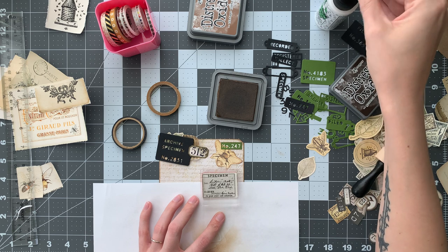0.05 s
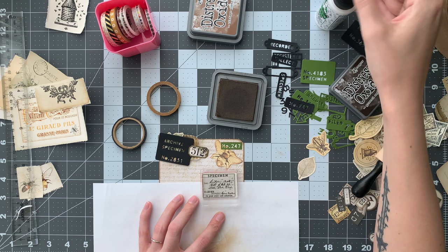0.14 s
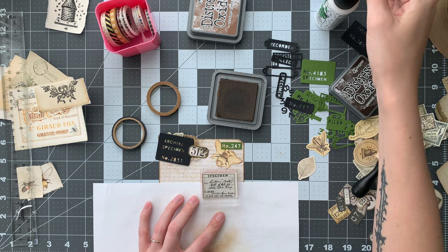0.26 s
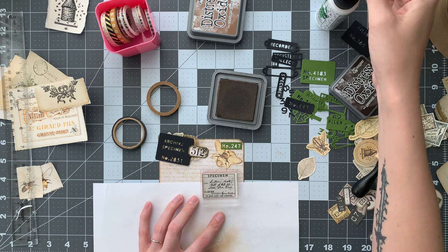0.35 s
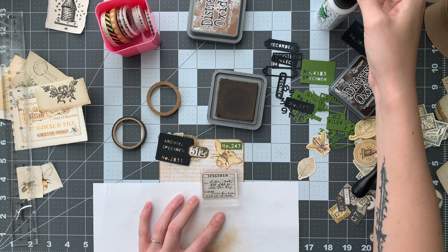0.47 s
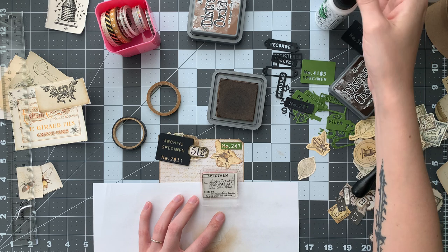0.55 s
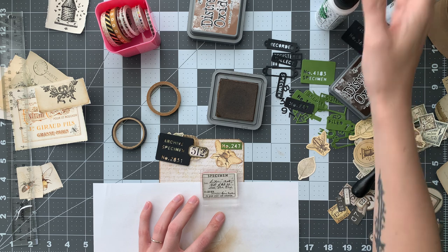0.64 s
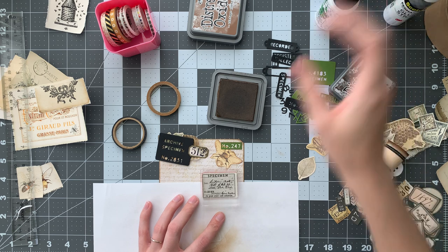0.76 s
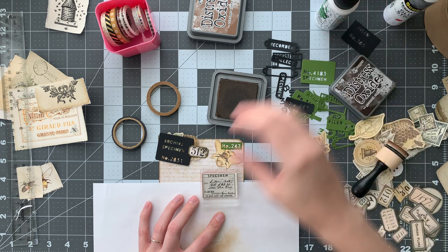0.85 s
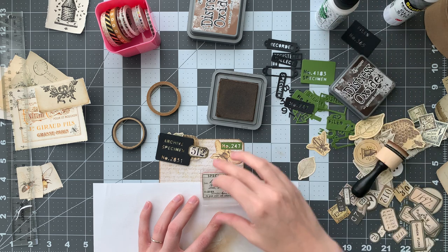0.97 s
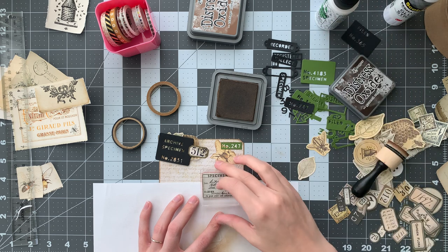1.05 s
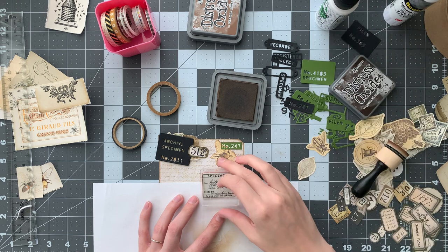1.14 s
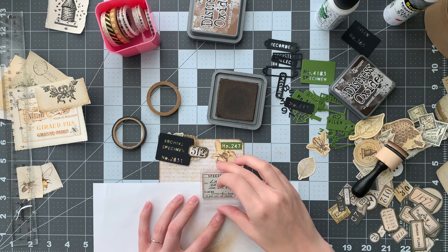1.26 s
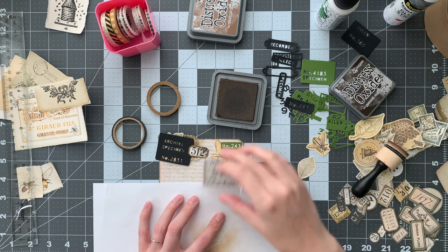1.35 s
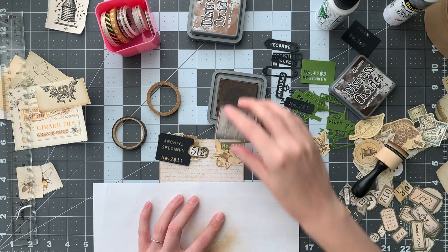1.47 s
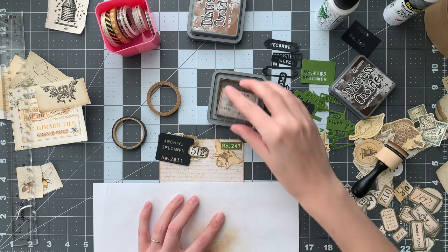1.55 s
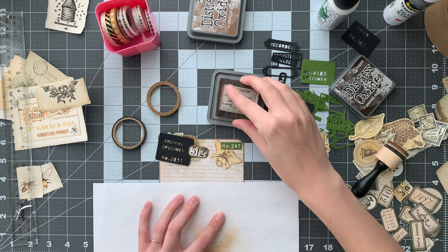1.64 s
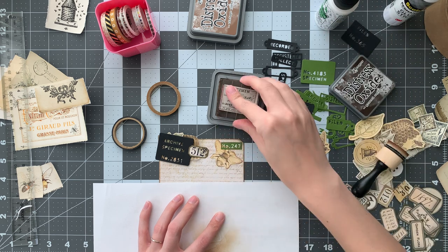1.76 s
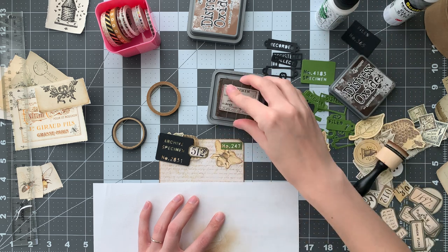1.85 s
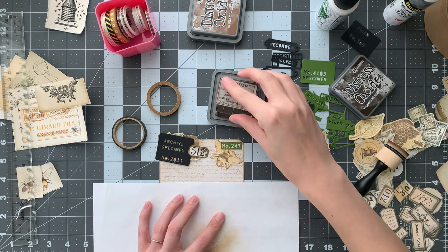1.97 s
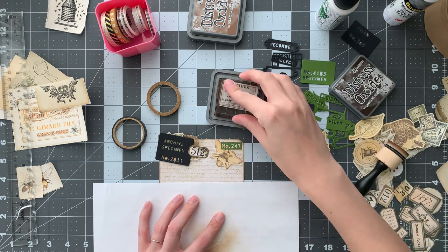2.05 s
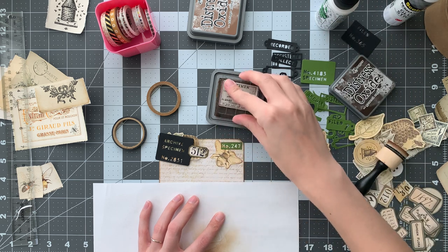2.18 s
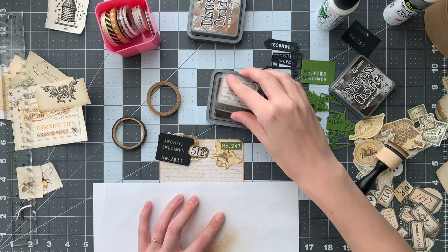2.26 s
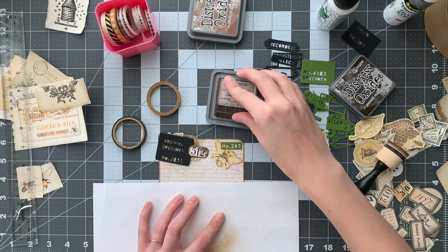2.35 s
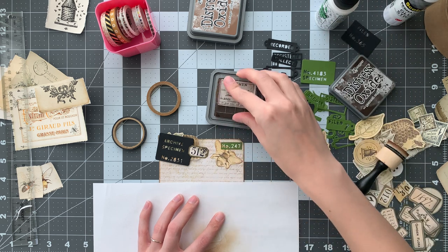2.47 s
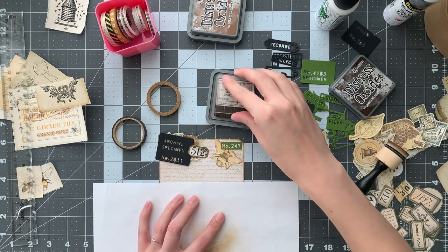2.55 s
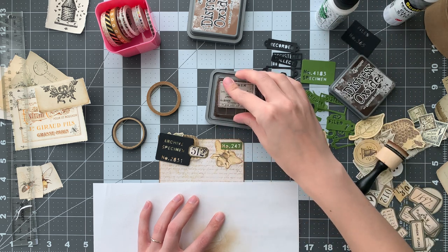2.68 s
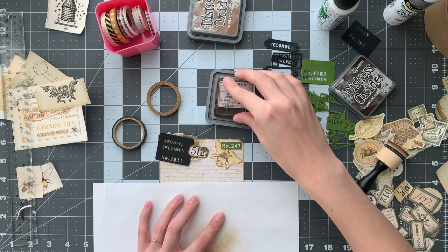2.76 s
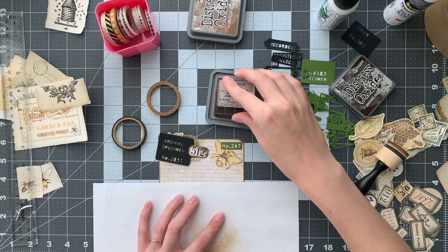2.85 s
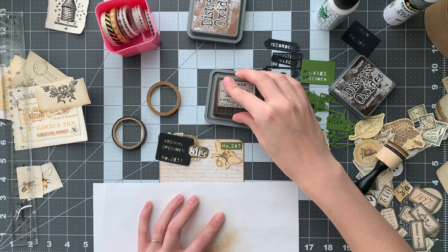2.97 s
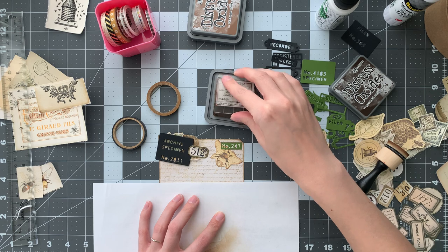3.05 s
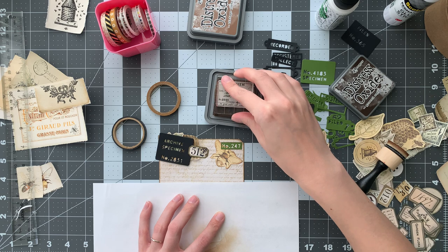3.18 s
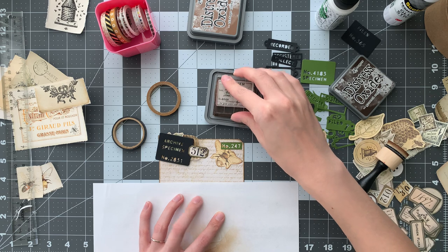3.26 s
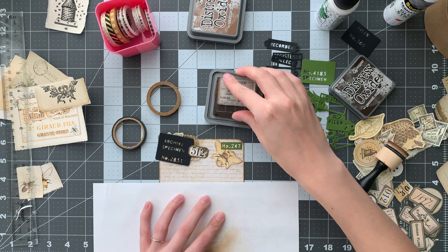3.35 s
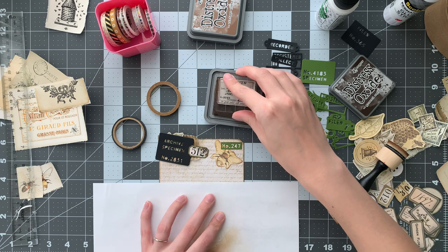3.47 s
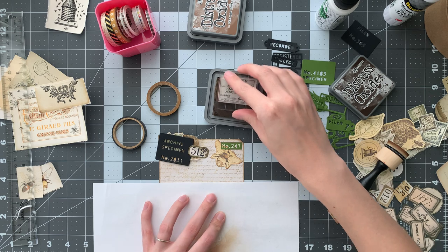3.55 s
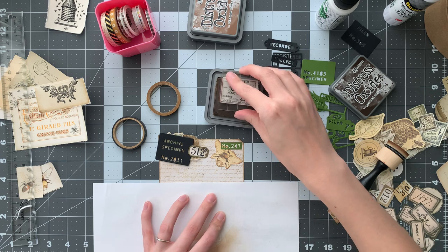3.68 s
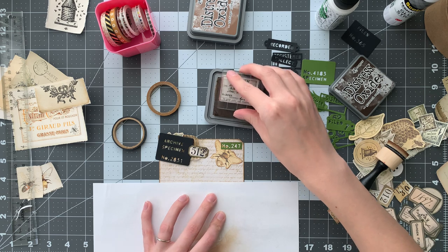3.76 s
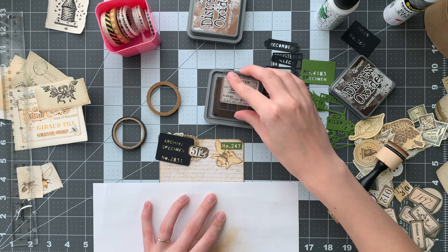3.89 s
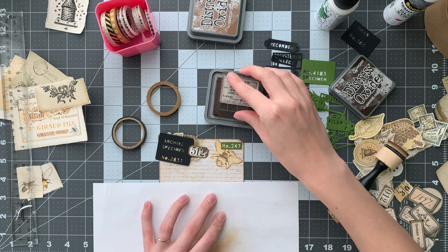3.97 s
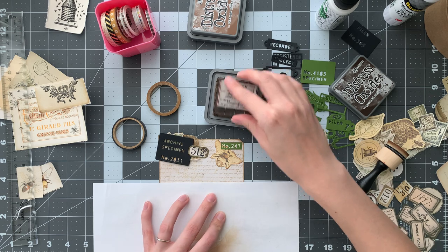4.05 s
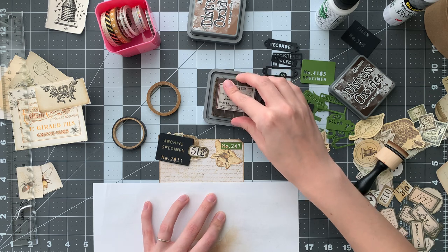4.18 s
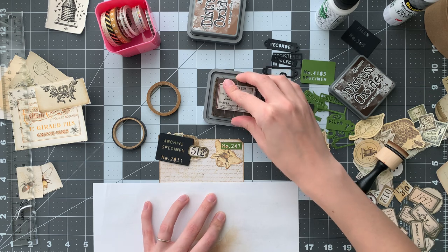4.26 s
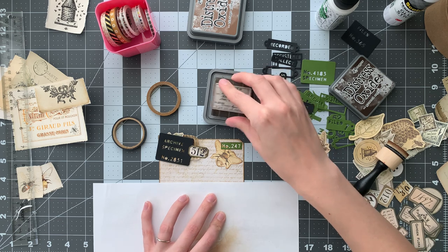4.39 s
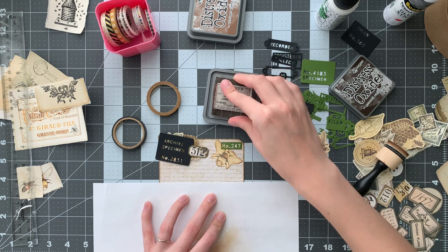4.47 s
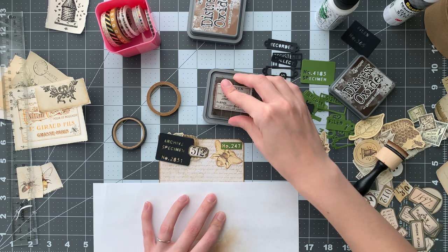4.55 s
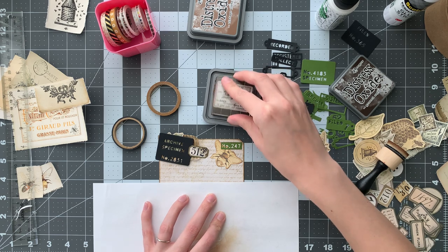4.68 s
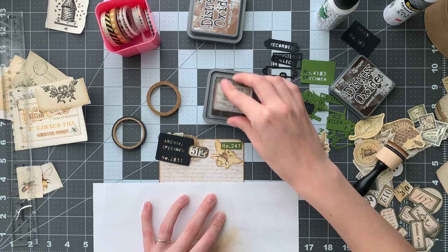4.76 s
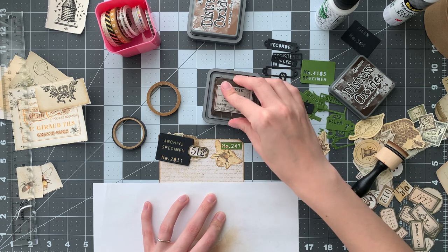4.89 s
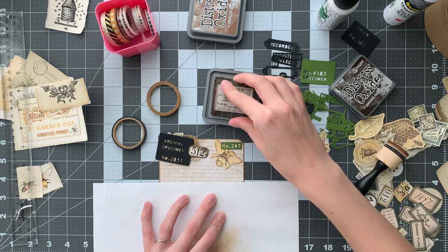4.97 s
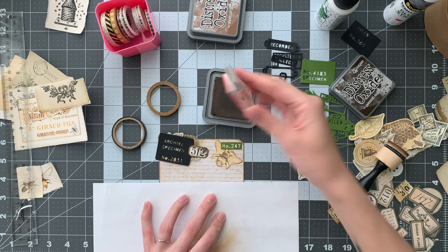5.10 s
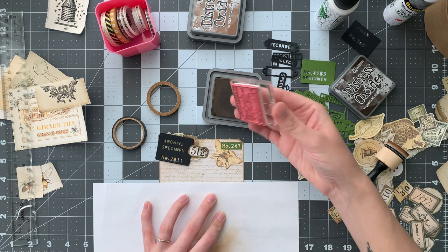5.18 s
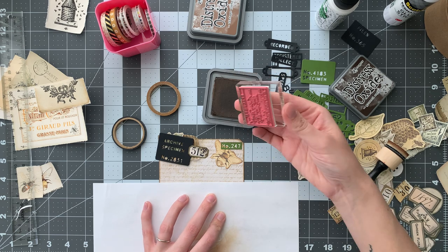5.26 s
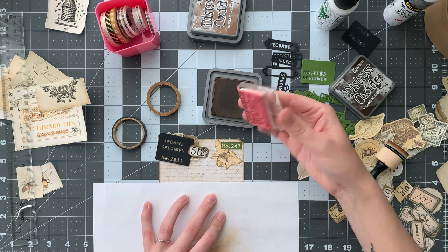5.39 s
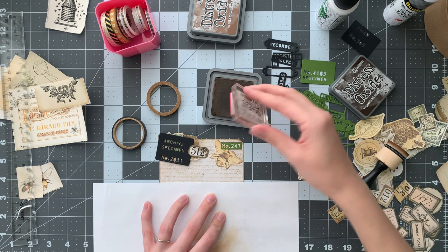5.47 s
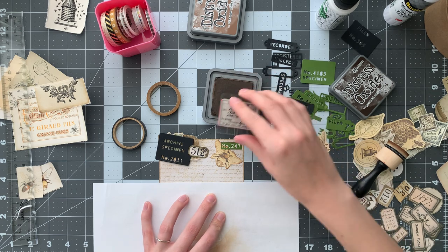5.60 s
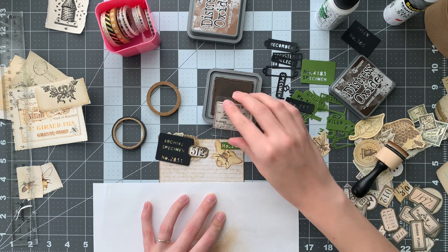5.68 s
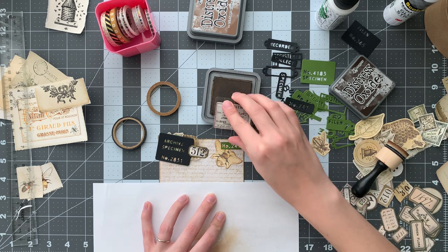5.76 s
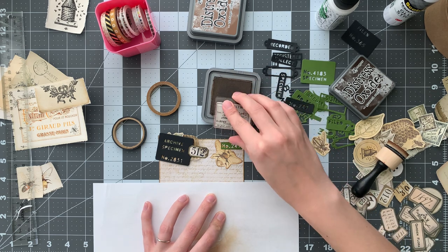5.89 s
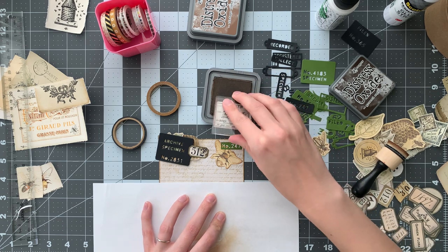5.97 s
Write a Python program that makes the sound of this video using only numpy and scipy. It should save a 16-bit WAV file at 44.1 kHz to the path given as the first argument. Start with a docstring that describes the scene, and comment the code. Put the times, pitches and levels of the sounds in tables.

```python
"""At a craft desk in a small, dry room, a rubber stamp on an acrylic block is dabbed twelve times on an ink pad.
Clicks and soft bumps come first. Each dab is a double impact, one edge and then the whole face: desk, plastic
pad case and block ring as sums of decaying modes, and the contacts are short filtered noise with reflections.
Tacky ink lets go in small noisy smacks and fingers rustle. Room air (shaped noise), a wavering low hum and
thin whines (sines) lie underneath; a faint treble hiss comes up and fades."""
import sys
import numpy as np
from scipy import signal
from scipy.fft import rfft, irfft
from scipy.io import wavfile
from scipy.ndimage import uniform_filter1d

SR = 44100
rng = np.random.default_rng(int(sys.argv[2]) if len(sys.argv) > 2 else 0)


def unload_audio(sound):
    """Save the sound as a 16-bit wav file, at the path given as the first command line argument."""
    columns = np.transpose(np.atleast_2d(sound))
    # keep every value between -1 and 1, then stretch to whole-number steps
    steps = np.round(np.clip(columns, -1, 1) * 32767)
    wavfile.write(sys.argv[1], SR, steps.astype(np.int16))


N = 265923

# Room air, spectrum before scaling: frequency_hz, level_db
AIR_SPECTRUM = [(15, -46.5), (25, -25.5), (37, -12.5), (91, -8.5), (122, -4), (136, -11), (148, -18),
                (173, -14), (684, -44), (1340, -44), (1800, -47), (7910, -54), (8580, -56.5),
                (10600, -51.5), (15500, -62.5)]
# Hum, level over time: time_s, level_db
HUM_LEVEL = [(0, -63), (.16, -45), (.38, -65), (.8, -57), (1.15, -75), (2.1, -59.5), (4.95, -58.5),
             (5.2, -69.5), (5.65, -54), (6.03, -59.5)]
# Thin steady whines: frequency_hz, level_db
WHINES = [(721.4, -101), (1157, -104), (1308, -100)]
# Small hard things click together: start_s, level_db
CLICKS = [(0.094, -82), (0.418, -66.5), (0.429, -62.5), (0.4444, -42.5), (1.284, -71)]
# Soft bumps of hand and block: start_s, level_db, hardness (0-1), tock_pitch_hz
BUMPS = [(0.106, -60.5, 0.38, 530), (.149, -57.5, 0, 640), (.421, -55.5, .5, 610),
         (0.595, -63.5, 0.35, 637), (0.776, -76, 0.03, 640), (2.416, -62, 0.85, 672),
         (3.132, -52.5, 0.55, 553), (5.166, -73.5, 0.63, 820), (5.251, -63.5, 0.45, 1190),
         (5.308, -64, 0.52, 535)]
# Dabs on the pad: start_s (seating), force_db, flatness (0-1), edge_lead_s,
# boom_db and knock_db (desk, relative to the force), tock_pitch_hz
DABS = [(1.658, -53, 0.088, 0.0034, 5.5, -3.5, 1146), (2.0522, -47.5, 0.29, 0.0077, 3, -3.5, 1000),
        (2.365, -55, 0.13, .004, 3, 2.5, 463), (2.635, -51.5, 0.086, 0.0034, 4, 4.5, 1010),
        (2.89, -46.5, 0.059, .0045, 9, 0.5, 797), (3.377, -44.5, 0.23, .002, -3.5, 1, 995),
        (3.627, -39, 0.51, 0.0022, -1, -12, 575), (3.8546, -44, 0.177, .002, 8, 2.5, 1026),
        (4.099, -37.5, 0.95, .0023, -2.5, -11, 935), (4.4343, -45, 0.26, .0055, 7.5, -2, 1190),
        (4.802, -44, 0.067, 0.0033, 5, 3, 1201), (5.765, -46.5, .16, 0.0047, 2, 2, 1005)]
# The rubber pulls free of the ink: start_s, level_db, tilt_db_per_octave
SMACKS = [(3.046, -67.5, -10), (4.318, -60, 0), (4.677, -68.5, 0)]

# Modes of the desk top, in three groups: frequency_hz, relative_level_db, t60_s
DESK_THUMP_MODES = [(45.25, -16, 0.034), (61, 0, 0.24), (83.6, -0.5, 0.15)]
DESK_BOOM_MODES = [(121.2, -6, 0.22), (158.3, -9.5, 0.29), (202.3, -4, 0.21), (228.1, -3, 0.17)]
DESK_KNOCK_MODES = [(286.5, -3.5, 0.093), (332.4, 4, 0.14), (406.5, -10, 0.16)]
# Modes of the plastic pad case: frequency_hz, relative_level_db, t60_s
CASE_MODES = [(480.5, -3, 0.12), (596, -0.5, 0.1), (780, -6, 0.12), (872, -1.5, 0.048), (952, 0.5, 0.08),
              (1003, -7.5, 0.021), (1153, -4, 0.11), (1436, 1, 0.066), (1740, -3, .06), (2016, -5.5, 0.029)]
# Modes of the acrylic block: frequency_hz, relative_level_db, t60_s
BLOCK_MODES = [(2380, -3, .07), (2527, -7, 0.07), (2690, -1, 0.08), (3024, -1.5, 0.08), (3240, -2.5, 0.036),
               (3494, -3.5, 0.034), (4080, -7.5, 0.08), (4730, -14.5, .04)]

# Spectra of the short contacts, the hiss and the rustle: frequency_hz, relative_level_db
CLICK_SPECTRUM = [(500, -24.5), (1100, -32), (1600, -13.5), (2700, -28), (4000, -19.5), (4800, -11),
                  (7000, -10), (9500, -6.5), (11000, 0.5), (12400, -9.5), (13200, -9.5), (14200, -10.5),
                  (16500, -28)]
CLACK_SPECTRUM = [(200, -29), (340, -11.5), (440, 2.5), (700, -1), (1050, 2.5), (1400, 0.5), (1750, -10.5),
                  (2100, -14.5), (2600, -23.5), (5000, -69.5)]
CRACK_SPECTRUM = [(900, -33.5), (1900, 2.5), (2800, -2.5), (4000, -7), (5200, -8.5), (6800, -16.5),
                  (9000, -41.5), (16000, -50)]
SNAP_SPECTRUM = [(4000, -38.5), (6500, -4.5), (8500, 3), (11000, 1.5), (13000, 1.5), (15000, -6.5),
                 (16500, -21.5)]
SMACK_SPECTRUM = [(300, -9.5), (650, -21), (1100, 0), (2200, -5.5), (2700, -4), (4200, -16.5), (5800, -26),
                  (8000, -44), (16000, -35)]
HISS_SPECTRUM = [(2000, -19.5), (5000, -8), (8500, -8), (12000, -3), (14000, -2.5), (15600, -11),
                 (16200, -44)]
RUSTLE_SPECTRUM = [(120, -15), (250, -4.5), (500, -3.5), (800, -7), (1250, -20), (1800, -36), (5000, -40)]

# Decay of the reflections: frequency_hz, t60_s
ROOM_T60 = [(300, 0.22), (1000, .15), (3000, 0.19), (7000, 0.15), (14000, 0.092)]
# Likeness of left and right, near sounds and room air: frequency_hz, coherence (0-1)
NEAR_COHERENCE = [(100, 0.89), (400, 1), (1000, 0.54), (2000, 0.26), (5500, 0.29), (8000, 0.92), (16000, 1)]
AIR_COHERENCE = [(60, 0.85), (130, .93), (300, 0.8), (700, 0.54), (1500, .15), (5500, 0.069), (8000, 1),
                 (16000, 0.57)]
# Phase lead of the left microphone over the right: frequency_hz, phase_rad
LEFT_PHASE = [(20, 0), (150, 0.36), (450, 1.09), (1100, 0.62), (1600, 4.5), (2200, 1.5), (3000, 1.5),
              (5500, 3), (6700, 0), (8500, -np.pi), (11000, -2 * np.pi), (13500, -3 * np.pi),
              (15500, -4 * np.pi)]
# Level of the left microphone over the right: frequency_hz, level_db
LEFT_BALANCE = [(100, 0.2), (300, -0.3), (550, 1.5), (1100, 1), (2000, 0.1), (5000, -0.5), (8000, -0.5)]

# Growth of a dab's parts: level_db at the usual force, slope (dB per dB of force), flat_db (added when flat)
USUAL_FORCE_DB = -46
THUMP_LAW, TOCK_LAW = (-45, 0.3, 0), (-51, 0.77, 0)
CLACK_LAW, CRACK_LAW, SNAP_LAW = (-47.5, 1, 0), (-56, 0.84, 10.9), (-80, 0.34, 32.5)
# Growth of a bump's parts: soft_db relative to the bump, hard_db (added at hardness 1)
BUMP_KNOCK, BUMP_TOCK, BUMP_CLACK, BUMP_CRACK = (-16, 9.9), (-40.5, 46), (-36, 37), (-50.5, 39)

EDGE_DB, EDGE_FLAT_DB = -2, -11  # first edge against the seating; added to it when the landing is flat
SEATING_DECAY_S, FLAT_SHORTENS = 0.0027, 0.93  # decay constant, and the share a flat landing takes off
FELT_RISE_S = 0.003  # the felt softens the onset of the first touch
CASE_DB, BLOCK_DB = -1, -0.5  # ringing against the direct chatter of the contact
TOCK_T60_S = 0.038
AIR_DB = -59.5
HUM_HZ, HUM_WAVER_DB = 123, 4.5
HISS_START_S, HISS_RISE_S, HISS_DB, HISS_FADE_DB_PER_S = 3.24, 0.06, -70.5, 32
RUSTLE_S, RUSTLE_WIDTH_S, RUSTLE_DB = 4, 0.14, -81.5
LOWPASS_HZ = 16300
BLOW_S = 0.06  # reference duration for the level of a short sound

TIME = np.arange(N) / SR
RING = np.arange(12288) / SR  # time axis of one impact, s


def amp(db):
    """Level to amplitude: 20 dB is a factor of ten."""
    return 10 ** (np.asarray(db) / 20)


def evened(x):
    """Normalization by the root mean square, to rms 1."""
    return x / np.sqrt(np.mean(x ** 2) + 1e-30)


def blow(x, db):
    """Equal energy: a short sound is given the energy of BLOW_S seconds at rms level db."""
    return amp(db) * evened(x) * np.sqrt(BLOW_S * SR / x.shape[-1])


def read(points, hz):
    """Interpolation of a table on a logarithmic frequency axis."""
    f, value = np.transpose(points)
    return np.interp(np.log(hz + 1), np.log(f + 1), value)


def add(mix, s, sound):
    """Superposition: a sound is summed into the mix from time s."""
    part = mix[:, max(round(s * SR), 0):][:, :sound.shape[-1]]
    part += sound[..., :part.shape[1]]


def coloured(x, spectrum, size=2048):
    """Minimum-phase filtering: the phase follows causally from the log magnitude by the Hilbert transform."""
    hz = abs(np.fft.fftfreq(size, 1 / SR))
    log_gain = np.log(amp(read(spectrum, hz)))
    response = np.exp(signal.hilbert(log_gain).conj())
    taps = np.fft.ifft(response).real[None, :size // 2]
    return signal.fftconvolve(x, taps, axes=1)[:, :x.shape[1]]


def noise_pair(coherence, size):
    """Partial coherence: the right channel blends the left's white noise with independent noise."""
    left, other = rfft(rng.standard_normal((2, size)))
    c = np.clip(read(coherence, np.fft.rfftfreq(size, 1 / SR)), -1, 1)
    right = c * left + np.sqrt(1 - c ** 2) * other
    return irfft(np.array([left, right]), size)


def wander(rate_hz):
    """Slow random fluctuation of rms 1: its amplitude spectrum falls exponentially with frequency."""
    falloff = np.exp(-np.fft.rfftfreq(N, 1 / SR) / rate_hz)
    return evened(irfft(rfft(rng.standard_normal(N)) * falloff, N))


def room_air():
    """Stationary random noise: a low rumble under fainter treble, partly coherent between the ears."""
    gain = amp(read(AIR_SPECTRUM, np.fft.rfftfreq(N, 1 / SR)))
    return amp(AIR_DB) * evened(irfft(rfft(noise_pair(AIR_COHERENCE, N)) * gain, N))


def hum():
    """Frequency and amplitude modulation: a low sine wavers in pitch and level."""
    pitch_hz = HUM_HZ + 4 * wander(rate_hz=7.7)
    waver = amp(HUM_WAVER_DB * wander(rate_hz=3.2))
    tone = np.sin(2 * np.pi * np.cumsum(pitch_hz) / SR) * waver
    return evened(tone) * amp(np.interp(TIME, *np.transpose(HUM_LEVEL)))


def whines():
    """Frequency modulation: faint sines, each with its own slight unsteadiness of pitch."""
    out = np.zeros(N)
    for hz, db in WHINES:
        cycles = hz * np.cumsum(1 + 0.0056 * wander(rate_hz=18)) / SR
        out += amp(db) * evened(np.sin(2 * np.pi * cycles))
    return out


def contact(spectrum, decay_s, room_db):
    """Contact noise: hard surfaces chatter briefly, then dense reflections from desk and walls decay."""
    envelope = np.exp(-RING / decay_s) * (1 - np.exp(-2.5 * RING / decay_s)) ** 2
    direct = noise_pair(NEAR_COHERENCE, len(RING)) * envelope
    hz, t, z = signal.stft(noise_pair(NEAR_COHERENCE, len(RING)), SR, nperseg=256)
    decay = amp(-60 * t / read(ROOM_T60, hz)[:, None])
    tail = signal.istft(z * decay, SR, nperseg=256)[1][:, :len(RING)]
    # early reflections are the strongest
    tail *= (1 - np.exp(-RING / 0.0046)) * (1 + 0.7 * np.exp(-RING / 0.012))
    return evened(coloured(direct, spectrum)) + amp(room_db) * evened(coloured(tail, spectrum))


def clicks():
    """Impact of small hard bodies: short, sharp contact noise with weak reflections."""
    out = np.zeros((2, N))
    for s, db in CLICKS:
        add(out, s, blow(contact(CLICK_SPECTRUM, decay_s=0.0018, room_db=-10.0), db))
    return out


def ring(modes, rise_cycles, scatter_db, spread, alternate=False):
    """Modal superposition: decaying modes build up over some cycles, their strength set by the spot struck."""
    hz, db, t60 = np.transpose(modes)[:, :, None]
    luck, turn = rng.standard_normal((len(modes), 2)).T[:, :, None]
    shape = amp(db + scatter_db * luck - 60 * RING / t60)
    shape *= 1 - np.exp(-RING * hz / rise_cycles)
    if alternate:  # away from the struck spot, neighbouring modes swing against each other
        shape[1::2] *= -1
    phase = 2 * np.pi * hz * RING
    sides = [(shape * np.sin(phase + side * spread * turn)).sum(0) for side in (-1, 1)]
    return np.array(sides)


def tock(hz, db):
    """Single-mode resonance: whatever is pressed gives a hollow tock, its pitch depending on the spot."""
    return blow(ring([(hz, 0, TOCK_T60_S)], rise_cycles=0.54, scatter_db=0, spread=0.069), db)


def desk(thump_db, boom_db, knock_db):
    """Plate modes: the desk top gives slowly as a whole, booms, and knocks in its higher modes."""
    thump = ring(DESK_THUMP_MODES, rise_cycles=0.96, scatter_db=3, spread=0.068)
    boom = ring(DESK_BOOM_MODES, rise_cycles=0.76, scatter_db=2.0, spread=0.04, alternate=True)
    knock = ring(DESK_KNOCK_MODES, rise_cycles=1.0, scatter_db=4.0, spread=0.24, alternate=True)
    return blow(thump, thump_db) + blow(boom, boom_db) + blow(knock, knock_db)


def plastic(clack_db, crack_db, decay_s, room_db):
    """Impact excitation of modes: the case rings under a clack, the block under a brighter crack."""
    case = evened(ring(CASE_MODES, rise_cycles=0.17, scatter_db=4.0, spread=0.71))
    block = evened(ring(BLOCK_MODES, rise_cycles=3.6, scatter_db=1.0, spread=0.66))
    clack = contact(CLACK_SPECTRUM, decay_s, room_db) + amp(CASE_DB) * case
    crack = contact(CRACK_SPECTRUM, decay_s, room_db + 3.5) + amp(BLOCK_DB) * block
    return blow(clack, clack_db) + blow(crack, crack_db)


def bumps():
    """Contact stiffness: the harder the bump, the more knock, tock, clack and crack join the desk's boom."""
    out = np.zeros((2, N))
    for s, db, hard, tock_hz in BUMPS:
        knock_db, tock_db, clack_db, crack_db = (
            db + soft_db + hard_db * hard
            for soft_db, hard_db in (BUMP_KNOCK, BUMP_TOCK, BUMP_CLACK, BUMP_CRACK))
        add(out, s, tock(tock_hz, tock_db))
        add(out, s, desk(db, db, knock_db))
        add(out, s, plastic(clack_db, crack_db, decay_s=0.0045, room_db=-1.5))
    return out


def dabs():
    """Double impact: one edge touches, then the block seats; a flatter landing gives a shorter, stronger snap."""
    out = np.zeros((2, N))
    for s, force_db, flat, lead_s, boom_db, knock_db, tock_hz in DABS:
        thump_db, tock_db, clack_db, crack_db, snap_db = (
            db + slope * (force_db - USUAL_FORCE_DB) + flat_db * flat
            for db, slope, flat_db in (THUMP_LAW, TOCK_LAW, CLACK_LAW, CRACK_LAW, SNAP_LAW))
        edge_db = EDGE_DB + EDGE_FLAT_DB * flat
        decay_s = SEATING_DECAY_S * (1 - FLAT_SHORTENS * flat)
        edge = plastic(clack_db + edge_db, crack_db + edge_db, decay_s=0.0011, room_db=-5)
        edge *= 1 - np.exp(-RING / FELT_RISE_S)
        seating = plastic(clack_db, crack_db, decay_s, room_db=-0.5 - 2.8 * flat)
        snap = contact(SNAP_SPECTRUM, 1.6 * decay_s, room_db=0.5 - 7.7 * flat)
        add(out, s - lead_s - 0.001, edge)
        add(out, s - 0.0012, desk(thump_db, force_db + boom_db, force_db + knock_db))
        add(out, s - 0.0006, seating)
        add(out, s, tock(tock_hz, tock_db))
        add(out, s, blow(snap, snap_db))
    return out


def ink_smacks():
    """Adhesive release: tacky ink lets go of the rubber in a short noise, its spectrum tilted per event."""
    out = np.zeros((2, N))
    for s, db, tilt_db in SMACKS:
        spectrum = [(hz, level + tilt_db * np.log2(hz)) for hz, level in SMACK_SPECTRUM]
        add(out, s, blow(contact(spectrum, decay_s=0.0035, room_db=-1.5), db))
    return out


def hiss():
    """Enveloped noise: a faint treble hiss rises linearly and fades exponentially."""
    age = np.maximum(TIME - HISS_START_S, 0)
    envelope = np.minimum(age / HISS_RISE_S, 1) * amp(HISS_DB - HISS_FADE_DB_PER_S * age)
    return evened(coloured(noise_pair(AIR_COHERENCE, N), HISS_SPECTRUM)) * envelope


def rustle():
    """Stick-slip friction: fingers shift on the block as it is turned over, a randomly modulated noise."""
    grip = evened(uniform_filter1d(rng.standard_normal(N), size=500))  # skin sticks and slips
    turning = np.exp(-((TIME - RUSTLE_S) / RUSTLE_WIDTH_S) ** 2)
    rubbing = evened(coloured(noise_pair(NEAR_COHERENCE, N), RUSTLE_SPECTRUM))
    return rubbing * turning * amp(RUSTLE_DB + 4.9 * grip)


def scene():
    """Linear superposition of everything on and around the desk."""
    background = room_air() + hum() + whines() + hiss()
    handling = clicks() + bumps() + ink_smacks() + rustle()
    return background + handling + dabs()


def record(dry):
    """Interaural differences: two microphones differ in phase and level; a low-pass then limits the band."""
    hz = np.fft.rfftfreq(N, 1 / SR)
    # half of each difference goes to either side
    left = np.exp(0.5j * read(LEFT_PHASE, hz)) * amp(read(LEFT_BALANCE, hz) / 2)
    pair = irfft(rfft(dry) * np.array([left, 1 / left]), N)
    lowpass = signal.firwin(301, LOWPASS_HZ, window=("kaiser", 9), fs=SR)
    return signal.oaconvolve(pair, lowpass[None], "same")


dry = scene()
out = record(dry)
unload_audio(out)
```